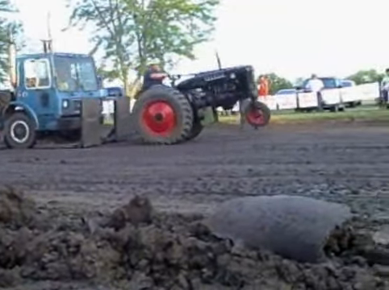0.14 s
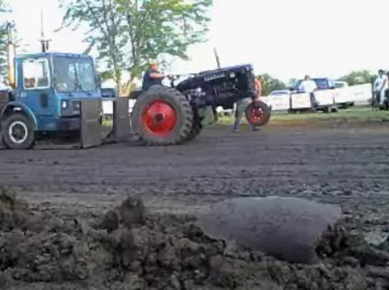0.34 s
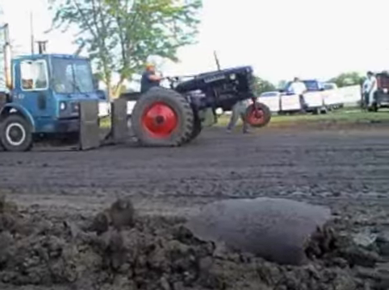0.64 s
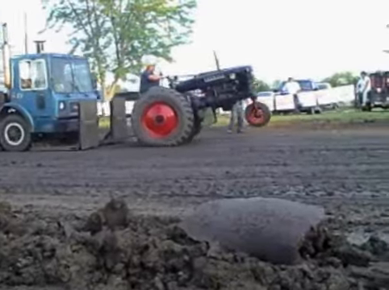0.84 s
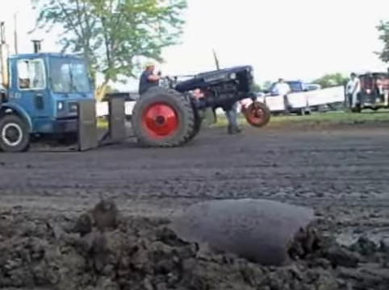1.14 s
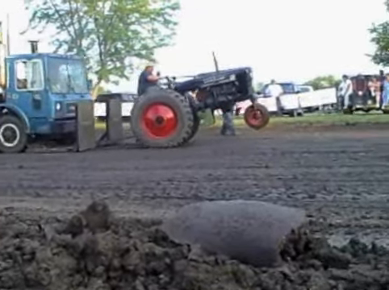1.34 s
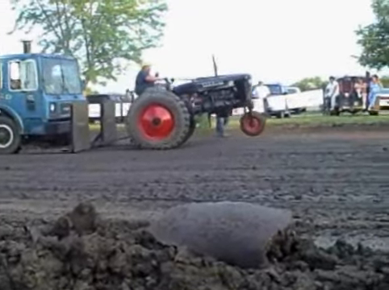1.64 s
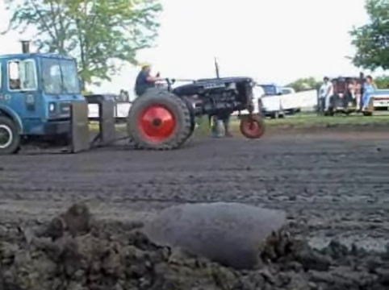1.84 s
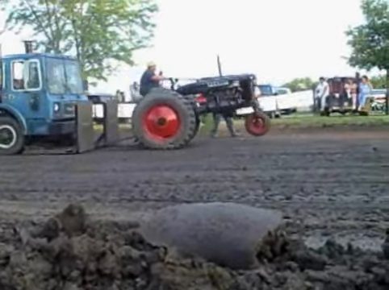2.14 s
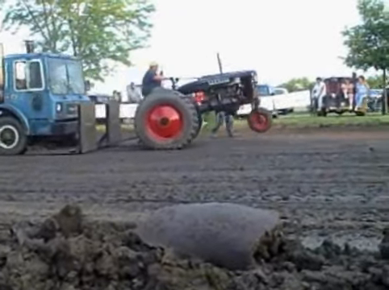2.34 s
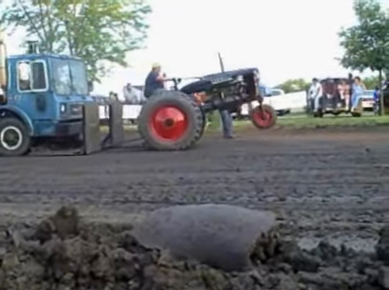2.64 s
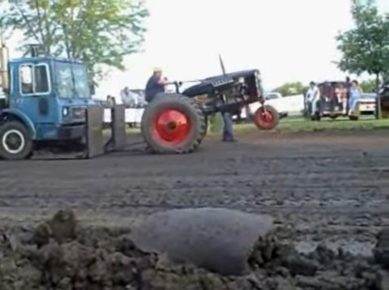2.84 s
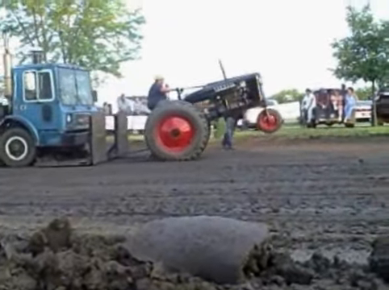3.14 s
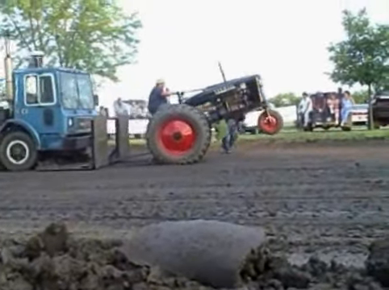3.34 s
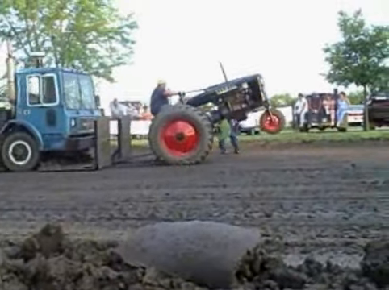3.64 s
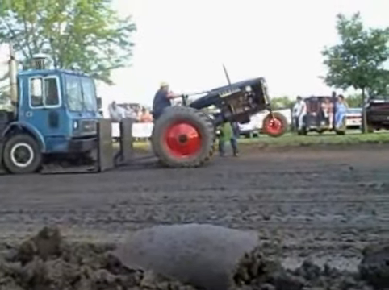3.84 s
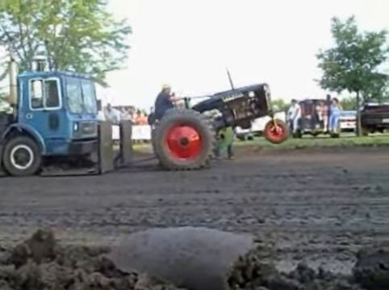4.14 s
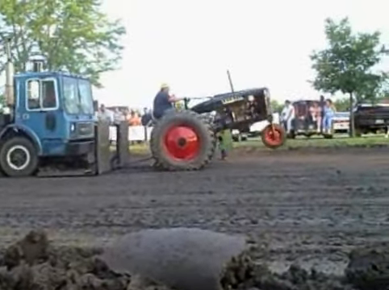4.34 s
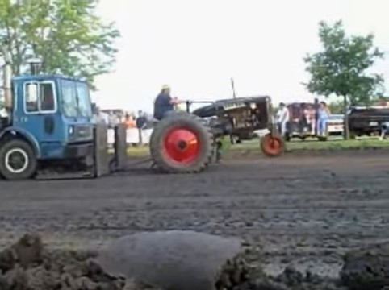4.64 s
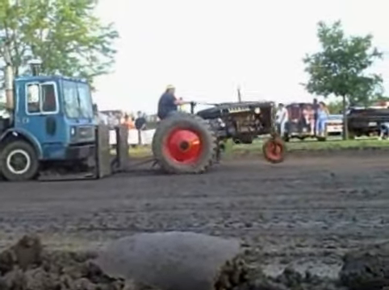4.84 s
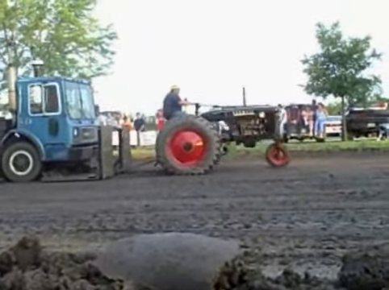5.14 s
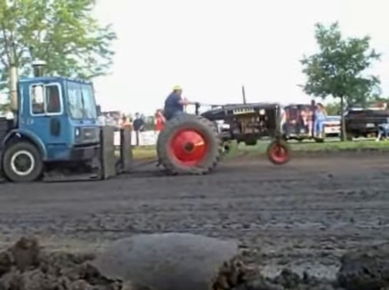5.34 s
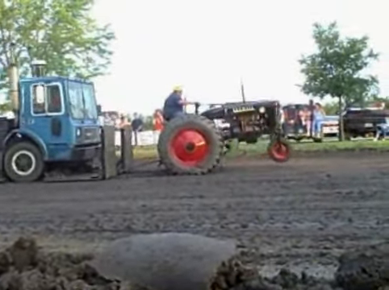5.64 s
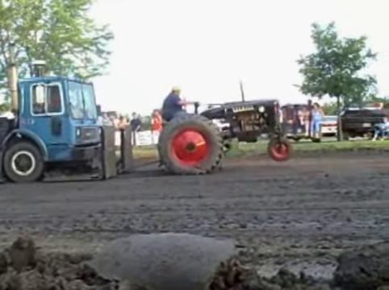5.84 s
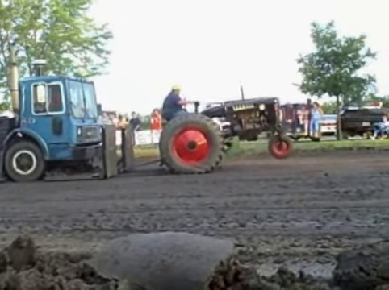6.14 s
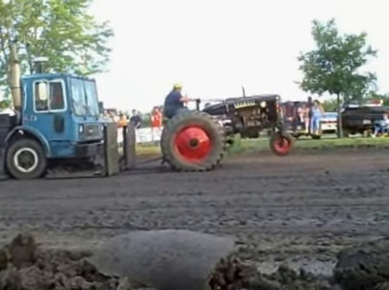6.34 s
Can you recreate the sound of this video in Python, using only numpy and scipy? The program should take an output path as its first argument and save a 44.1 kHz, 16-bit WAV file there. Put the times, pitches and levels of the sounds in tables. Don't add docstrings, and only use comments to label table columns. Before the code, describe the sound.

An old four-cylinder tractor roars and thumps hard dragging a heavy sled, then is pulled steadily down, firings spreading and fading towards a stall.

```python
import sys
import numpy as np
from scipy import signal
from scipy.fft import rfft, irfft, next_fast_len
from scipy.io import wavfile
from scipy.ndimage import uniform_filter1d

SR = 44100
rng = np.random.default_rng(int(sys.argv[2]) if len(sys.argv) > 2 else 0)


def boost(x):
    u = np.asarray(x, float) / 20
    return 10 ** u


def file_out(sig):
    cols = np.atleast_2d(sig).T
    lim = np.clip(cols, -1, 1)
    pcm = np.round(lim * 32767).astype(np.int16)
    wavfile.write(sys.argv[1], SR, pcm)


N = 286629

FULL_SPEED_HZ = 44
CYLINDER_DB = [0, -1, .5, -.5]
# peak_s, peak_db, pitch_hz
SPITS = [(0.1387, -21.5, 5500), (0.2513, -20, 5120), (0.4244, -20, 5940), (0.523, -21, 6030),
         (0.5906, -18, 5810), (0.6338, -17.5, 5050), (0.7016, -23.5, 5890), (0.7938, -22, 5530),
         (0.9076, -20.5, 5440), (1.047, -22, 5930), (1.3047, -20.5, 5500), (1.3881, -24, 5870),
         (1.4361, -18.5, 5620), (1.5338, -19.5, 4960), (1.6573, -23.5, 4460), (2.0815, -22, 5600),
         (2.2303, -19, 5110), (2.396, -19, 5360), (2.592, -23, 5740), (2.6559, -21.5, 4870),
         (3.2241, -26.5, 6100), (3.4142, -22, 5060), (3.8326, -26, 4350), (4.0555, -24.5, 5500),
         (4.2956, -24.5, 4900), (4.458, -25, 4900), (4.588, -26.5, 5100), (5.0923, -22, 4370),
         (5.6371, -30, 4900), (5.883, -34.5, 5550)]
# full_speed_db, slope_db per octave lost, bend_db per octave squared
PUFF_FADE = (-30, -7.5, -0.96)


def firing_rate():
    # time_s, rate_hz
    speed = [(0.0, 45.87), (0.2, 44.67), (0.87, 43.72), (1.48, 39.66), (1.81, 42.19), (2.43, 35.11),
             (2.71, 34.92), (3.69, 28.03), (4.3, 25.19), (4.46, 23.74), (4.92, 21.53), (5.4, 17.94),
             (5.7, 16.43), (5.83, 16.6), (6.14, 13.95), (6.5, 11.2)]
    time_s, rate_hz = np.transpose(speed)
    return np.interp(np.arange(N) / SR, time_s, rate_hz)


def crank():
    first_turn = -.49
    return first_turn + np.cumsum(firing_rate()) / SR


def firings():
    return np.flatnonzero(np.diff(np.floor(crank())) > 0)


def faded(law):
    lost = np.log2(FULL_SPEED_HZ / firing_rate())
    return law[0] + law[1] * lost + law[2] * lost ** 2


def evened(x, span_s):
    size = int(span_s * SR)
    power = uniform_filter1d(uniform_filter1d(x ** 2, size=size), size=size)
    return x / np.sqrt(power + 1e-12)


def coloured(x, spectrum):
    size = next_fast_len(2 * N) // 2 * 2
    hz = np.arange(size // 2 + 1) * SR / size + 1
    table_hz, table_db = np.transpose(spectrum)
    gain_db = np.interp(np.log(hz), np.log(table_hz), table_db)
    fold = irfft(np.log(boost(gain_db)))
    fold[1:size // 2] *= 2
    fold[size // 2 + 1:] = 0
    return irfft(rfft(x, size) * np.exp(rfft(fold)), size)[:N]


def rumble():
    # pitch_hz, level_db per Hz
    ground = [(15, -20.5), (30, -5), (50, -3), (75, -4.5), (95, -5), (120, -10), (170, -19), (260, -32),
              (420, -55), (600, -64.5)]
    return evened(coloured(rng.standard_normal(N), ground), 0.15)


def drone():
    # pitch_hz, level_db per Hz
    panels = [(90, -24), (125, 0.5), (170, -5.5), (250, -10), (320, -13), (400, -25.5), (600, -49.5)]
    # full_speed_db, slope_db per octave lost, bend_db per octave squared
    fade = (-29, -11, 2.5)
    roar = evened(coloured(rng.standard_normal(N), panels), 0.25)
    return boost(faded(fade) - 0.5) * roar


def spits(width_hz, length_s):
    out = np.zeros(N + 4000)
    s = np.arange(-300, 3000) / SR
    shape = np.exp(-np.abs(s) / np.where(s < 0, .0032, length_s))
    for at_s, peak_db, hz in SPITS:
        band = signal.butter(2, [hz - width_hz, hz + width_hz], "band", fs=SR, output="sos")
        burst = signal.sosfilt(band, rng.standard_normal(len(s)))
        start = max(round(at_s * SR) - 300, 0)
        out[start:start + len(s)] += boost(peak_db - 2.0) * shape * burst / burst.std()
    return out[:N]


def outdoors(x):
    # pitch_hz, width_hz, depth_db
    dips = [(407.8, 70, -5.5), (949, 52, -5.5), (1227, 58, -9), (1563, 100, -3), (2056, 52, -4),
            (2630, 27, -0.5), (2940, 85, -2.5), (3470, 54, -3), (3767, 90, -4)]
    hz = np.arange(N // 2 + 1) * SR / N
    gain_db = sum(depth_db * np.exp(-((hz - dip_hz) / width_hz) ** 2) for dip_hz, width_hz, depth_db in dips)
    return irfft(rfft(x) * boost(gain_db), N)


def puffs(uneven_db, colour_db, lead, rise, fall):
    # pitch_hz, level_db per Hz
    colour = [(150, -26), (280, -9.5), (380, -3), (500, 1.5), (800, -1), (1200, -3), (2000, -4.5),
              (3300, -4.5), (3900, -5), (4500, -9), (7400, -9.5), (9000, -34.5)]
    edges_hz = [100, 600, 900, 1200, 1550, 1900, 2300, 2700, 3100, 3500, 3900, 4400, 5300, 6300, 9000]
    # full_speed_db, slope_db per octave lost, bend_db per octave squared
    clatter_fade = (-6.3, -5.5, 3.3)
    share = (firing_rate() / FULL_SPEED_HZ) ** .35
    rise, fall = rise * share, fall * share
    peak = rise * np.log(1 + 2 * fall / rise)
    turns = crank() + 1 + lead + peak
    which, angle = turns.astype(int), turns % 1
    opening = ((1 - np.exp(-angle / rise)) / (1 - np.exp(-peak / rise))) ** 2
    gate = opening * np.exp((peak - angle) / fall)

    chance = rng.standard_normal((which.max() + 1, len(edges_hz)))
    strength_db = uneven_db * chance[:, 0] + np.resize(CYLINDER_DB, len(chance))
    grit = boost(1.5 * rng.standard_normal(N // 30 + 1)).repeat(30)[:N]
    white = rng.standard_normal(N) * grit
    clatter_db = faded(clatter_fade)
    hiss = 0
    for k, band_hz in enumerate(zip(edges_hz, edges_hz[1:])):
        rush = gate * boost(strength_db + colour_db * chance[:, k + 1])[which]
        clatter = boost(clatter_db - 2.2 * np.log2(band_hz[1] / 1000))
        band = signal.butter(2, band_hz, "band", fs=SR, output="sos")
        part = signal.sosfilt(band, white * np.sqrt(rush ** 2 + clatter ** 2))
        hiss = hiss + (-1) ** k * part
    return evened(coloured(hiss, colour), .2)


def stack_ring():
    mode_hz, width_hz, ring_db, ring_share = 84.7, 11, 5.5, 0.15
    rate_hz = firing_rate()
    gain_db = 0
    for k in range(3):
        off_mode = ((k + 2) * rate_hz - mode_hz) / width_hz
        gain_db = gain_db + ring_db * ring_share ** k * np.exp(-off_mode ** 2)
    return gain_db


def train(at, strength, lead_s):
    clicks = np.zeros(N)
    clicks[np.clip(at - np.round(lead_s * SR).astype(int), 0, N - 1)] = strength
    return clicks


def thumps(at, uneven_db, jitter_s, echo_s, echo_db):
    # pitch_hz, gain_db
    stack = [(15, -28.5), (24, -12), (33, -8), (44, -10.5), (65, -2), (84, 7), (98, -8), (112, -14.5),
             (135, -16.5), (175, -26), (220, -23.5), (265, -21), (320, -38.5), (420, -55.5)]
    chance = rng.standard_normal((len(at), 2))
    strength = -boost(uneven_db * chance[:, 0] + np.resize(CYLINDER_DB, len(at)))
    clicks = train(at, strength, .002 + jitter_s * chance[:, 1])
    clicks = clicks + boost(echo_db) * train(at, strength, np.array(-echo_s))
    return evened(coloured(clicks, stack), .15)


def scene():
    # full_speed_db, slope_db per octave lost, bend_db per octave squared
    thump_fade = (-16.5, -3.5, -3.0)
    thump_db = faded(thump_fade) + stack_ring()
    low = boost(thump_db - 1.3) * thumps(firings(), uneven_db=0.5, jitter_s=.0001, echo_s=.031, echo_db=-12)
    low = low + boost(thump_db * .4 - 21.5) * rumble()
    hiss = puffs(uneven_db=.7, colour_db=2.5, lead=.09, rise=0.18, fall=.19)
    hiss = boost(faded(PUFF_FADE) + 4) * hiss
    return (low + drone() + outdoors(hiss) + spits(width_hz=600, length_s=0.0075))[None]


def camera(x, step_db, keep_db, wander_db, skirt_db, image_db):
    # low_hz, high_hz, level_db
    filled = [(3940, 6100, -7.5), (4310, 6500, 0.5), (5956, 6380, -3.5), (6460, 7262, 8.5)]
    # middle_s, half_length_s
    dropouts = [
        (.44, .011),
        (1.52, .019),
        (2.425, .012),
        (3.7, .011),
        (5.625, .019),
        (6.045, .012),
    ]
    # full_speed_db, slope_db per octave lost, bend_db per octave squared
    treble_fade = (-34, -6, -1.97)
    camera_rate_hz, hop, line_count = 16000, 882, 380

    n, k = np.arange(2 * hop)[:, None], np.arange(line_count)
    window = np.sin(np.pi * (n + .5) / (2 * hop))
    basis = window * np.cos(np.pi / hop * (n + .5 + hop / 2) * (k + .5)) * np.sqrt(2 / hop)
    padded = np.pad(x, (hop, 2 * hop))
    starts = np.arange(N // hop + 2) * hop
    lines = padded[starts[:, None] + np.arange(2 * hop)] @ basis
    hz, s = (k + .5) * SR / (2 * hop), starts / SR
    noise = rng.standard_normal(lines.shape)

    nearby = uniform_filter1d(lines ** 2 * (hz > 250), size=41, axis=1, mode="nearest")
    masking = np.sqrt(nearby + 1e-12)
    masking = uniform_filter1d(masking, size=3, axis=0)
    tilt_db = 1.5 * np.log2(np.clip(hz, 500, 4000) / 2000)
    step = masking * boost(step_db + tilt_db) * np.clip(hz / 340, .01, 1) ** 4
    coded = np.round(lines / step) * step

    for low_hz, high_hz, level_db in filled:
        band = (hz >= low_hz) & (hz < high_hz)
        level = np.sqrt(np.mean(lines[:, band] ** 2, axis=1))
        sudden = level > boost(keep_db) * signal.medfilt(level, kernel_size=15)
        level = level * boost(level_db + wander_db * rng.standard_normal(len(s)))
        coded[:, band] = np.where(sudden[:, None], lines[:, band], noise[:, band] * level[:, None])

    slow_db = faded(treble_fade) - faded(PUFF_FADE)
    level = level * boost(slow_db[np.minimum(starts, N - 1)] + 4.5)
    lost_s, half_s = np.transpose(dropouts)
    level[(np.abs(s[:, None] - lost_s) < half_s).any(axis=1)] *= .04
    from_spit_s = np.abs(s[:, None] - .005 - np.array(SPITS)[:, 0]).min(axis=1)
    level[from_spit_s < .01] *= boost(-4.5)

    over = hz - high_hz
    shape_db = np.where(over < 0, 0, skirt_db - 0.0096 * over - 5e-6 * over ** 2)
    mirrored = hz - (camera_rate_hz - high_hz)
    shape_db = np.where(mirrored > 0, image_db - 0.054 * mirrored, shape_db)
    top = hz >= low_hz
    coded[:, top] = (noise * level[:, None] * boost(shape_db))[:, top]
    frames = coded @ basis.T
    return (frames[1:, :hop] + frames[:-1, hop:]).ravel()[:N]


def top_cut(x):
    return signal.sosfilt(signal.butter(12, 9216, fs=SR, output="sos"), x)


def record(dry):
    overload = 0.74
    driven = overload * np.tanh(dry[0] / overload)
    heard = camera(driven, step_db=6.6, keep_db=5.0, wander_db=2.0, skirt_db=-20.5, image_db=-23.5)
    return top_cut(heard[None])


dry = scene()
out = record(dry)
file_out(out)
```